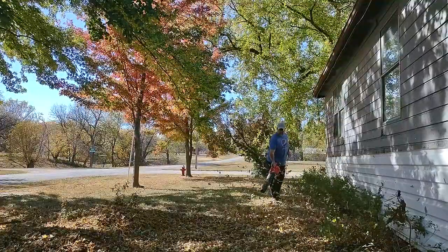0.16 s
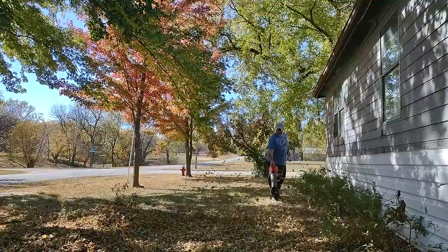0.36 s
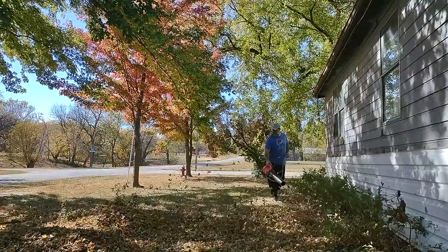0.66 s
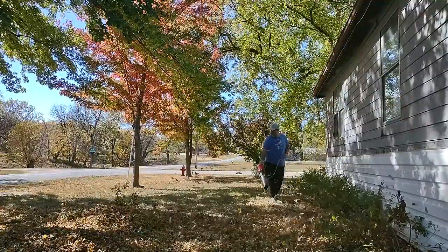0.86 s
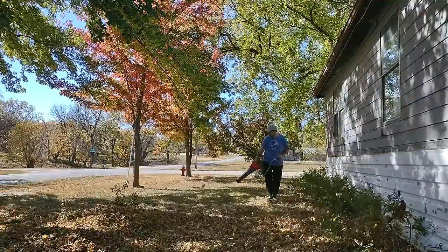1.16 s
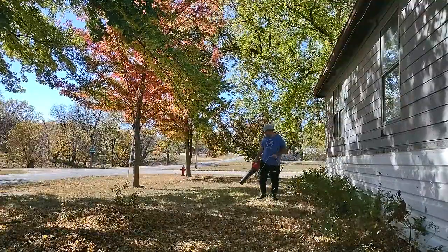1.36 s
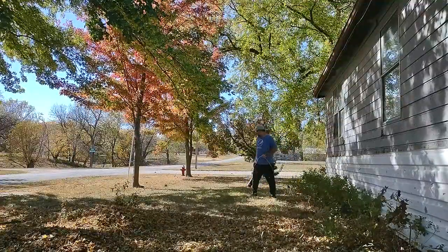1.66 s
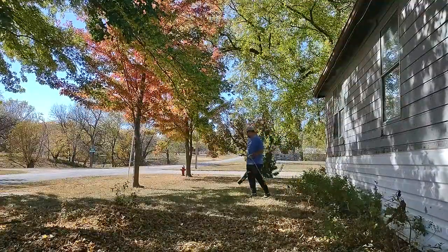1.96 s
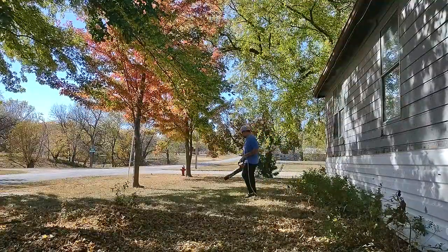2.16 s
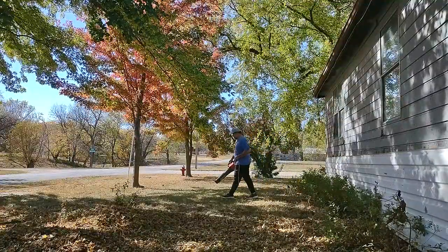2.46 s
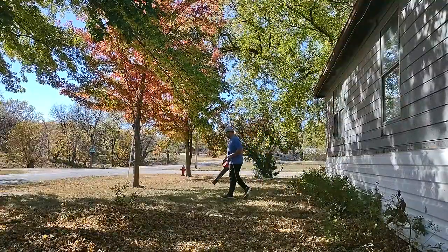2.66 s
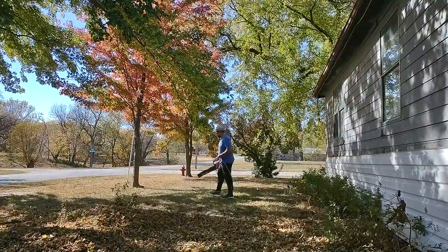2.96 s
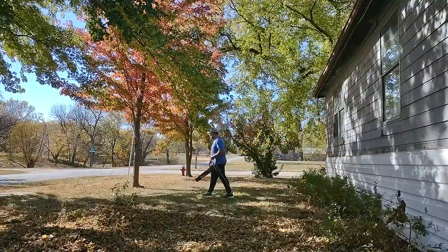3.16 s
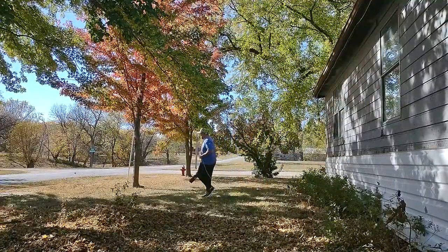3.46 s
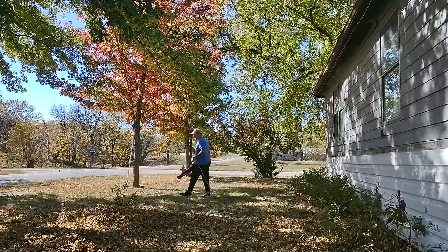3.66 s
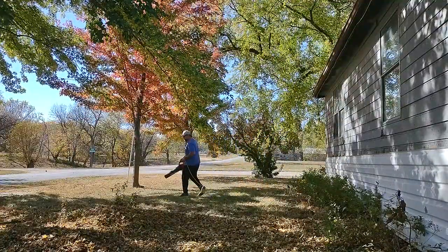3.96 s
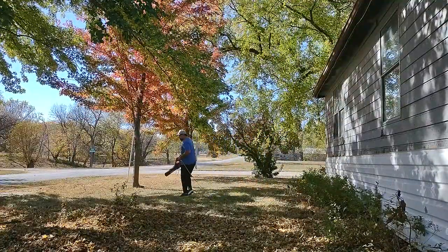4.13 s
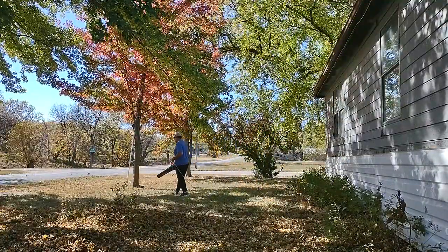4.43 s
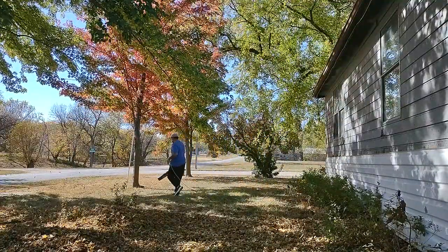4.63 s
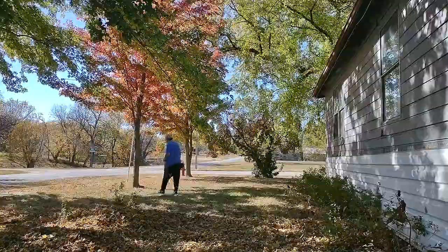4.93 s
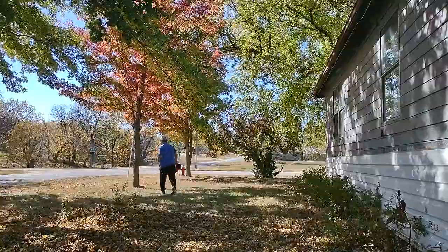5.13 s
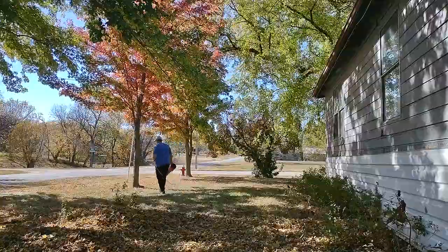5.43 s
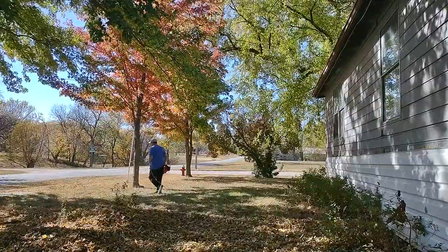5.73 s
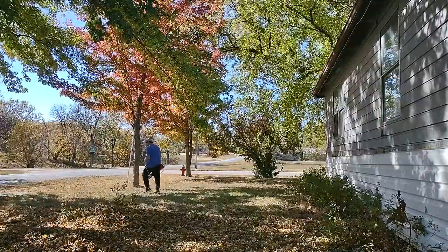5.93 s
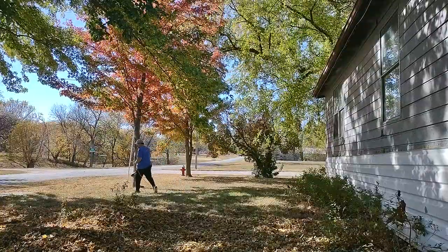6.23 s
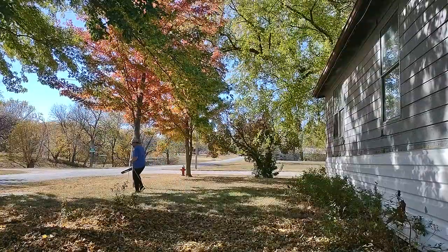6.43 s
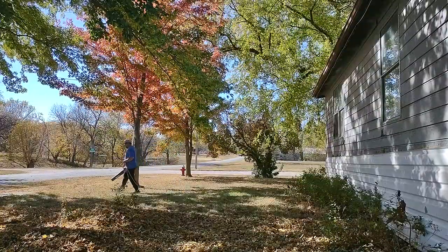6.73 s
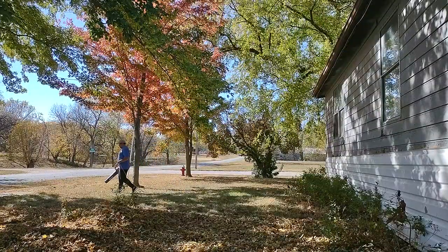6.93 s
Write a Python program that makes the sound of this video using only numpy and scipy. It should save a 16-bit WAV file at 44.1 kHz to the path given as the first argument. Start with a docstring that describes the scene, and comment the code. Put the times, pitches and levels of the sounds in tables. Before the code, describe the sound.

Outdoors beside a house wall, an electric leaf blower is already running: a broad, bright rush of air with a high, rapidly beating fan whine. It starts strong, drops as the nozzle swings away, returns in duller swells, and ends weaker. Faint breeze rumbles low on a fixed stereo microphone, with one soft low pop before the middle.

```python
"""On a lawn with a house wall to the right, an electric leaf blower is swung about and carried away.
Its rush is noise shaped by tube, housing and reflections, with a close echo from the wall.
Its eleven-blade fan whines as sines on one rotor angle, beating differently at the two microphones.
Puffs of breeze rumble low on the ports as shaped noise, with one pop, above a faint mains hum, a sine."""
import sys
import numpy as np
from scipy import signal
from scipy.fft import rfft, irfft
from scipy.io import wavfile
from scipy.ndimage import uniform_filter1d, map_coordinates

SR = 44100
rng = np.random.default_rng(int(sys.argv[2]) if len(sys.argv) > 2 else 0)


def waveform_to_disk(signal):
    """Save audio, clipped to [-1, 1], as 16-bit WAV at the path in sys.argv[1]."""
    frames = np.transpose(np.atleast_2d(signal))
    scaled = np.clip(frames, -1, 1) * 32767
    samples = np.round(scaled).astype(np.int16)
    wavfile.write(sys.argv[1], SR, samples)


N = 312669
TIME = np.arange(N) / SR
HZ = np.fft.rfftfreq(N + 3, 1 / SR) + 1  # one Hz up, so that logs and divisions stay finite

# Ways from the blower to the ports.
# Each row: time in seconds, lag of left behind right on the direct way in ms (below zero the left leads),
# wall echo delay at the right in ms.
PATHS = [(0, .04, 1.2), (1, .05, 1.2), (2.2, -.03, 1.3), (2.7, -.07, 2.2), (3.3, -.09, 2.45),
         (4.15, -.15, 3.03), (4.6, -.17, 3.12), (5.1, -.12, 2.76), (5.9, -.12, 2.88), (7.09, -.24, 3.45)]


def undb(db):
    """Decibels to gain."""
    return 10 ** (np.asarray(db) / 20)


def curves(table):
    """Each column of a table after the time, drawn sample by sample."""
    seconds, *columns = np.transpose(table)
    return np.array([np.interp(TIME, seconds, column) for column in columns])


def gains(table):
    """Level columns in dB joined as amplitudes, the way beats swell."""
    return curves([(seconds, *undb(db)) for seconds, *db in table])


def bumps_db(modes):
    """Resonances and notches as a dB curve over frequency."""
    return sum(db / (1 + (2 * (HZ - hz) / width) ** 2) for hz, width, db in modes)


def shaped(x, gain):
    """Filter by a gain over frequency."""
    return irfft(rfft(x, N + 3) * gain, N + 3)[..., :N]


def walk(rate):
    """Random levels held 1 / rate seconds and slewed twice."""
    hold = int(SR / rate)
    steps = np.repeat(rng.standard_normal(N // hold + 1), hold)
    return uniform_filter1d(uniform_filter1d(steps, hold), hold)[:N]


def delayed(x, ms):
    """A moving delay, read between samples; a negative delay reads ahead."""
    return map_coordinates(x, [np.arange(N) - ms * SR / 1000], order=3, mode="mirror")


def beams():
    """Gain in dB of five bands, low to high, as the turning nozzle beams each with its own strength."""
    # The nozzle's moves, in dB before each band takes its share.
    # Each row: time in seconds, level in dB, treble in dB, bass in dB.
    nozzle = [(0.0, 6.5, 1, 5.5), (1.07, 6, 1.5, -3), (1.31, 5, 2.5, 3.1), (1.61, 1.5, 1, -2.5),
              (1.97, -5.5, 0, 5), (2.09, -4.5, -1, 4.5), (2.32, -6, 0.8, 5.5), (2.8, -1.3, -2.5, -0.3),
              (3.1, -4.5, -4, 5.5), (3.52, 0, -2.5, -3.5), (3.82, -2.5, -3.2, -0.5), (4.36, 3.5, 1, -5.5),
              (4.54, 1.5, -0.5, -4), (4.9, -4, -2.5, 0.9), (5.5, 5, -6.5, 2.5), (6.4, -5, -3.5, 4.4),
              (6.58, -7, -5.5, 5.5), (7.09, -5, -2.5, -0.8)]
    # How far each band follows the level, the treble and the bass: one plain factor per band.
    level_share = (0.95, 1.05, 1.18, 0.78, 1.28)
    treble_share = (0.096, -0.15, -0.43, 1.51, 1.06)
    bass_share = (1, 0, 0, 0, 0)
    return np.transpose([level_share, treble_share, bass_share]) @ curves(nozzle)


def air(flicker):
    """Turbulent rush: noise coloured by tube and close reflections, its bands beamed and flickering."""
    # Colour of the rush. Each row: frequency in Hz, relative density in dB per Hz.
    rush_colour = [(200, -29), (330, -10.5), (480, -8), (620, -10), (1000, -5), (1450, -7), (2000, 0.5),
                   (2700, -1), (3500, -2), (4300, 7.5), (4900, -4), (7000, -7.5), (10000, -6),
                   (15500, -10.5)]
    # Nozzle tube and housing, resonances and a notch. Each row: frequency in Hz, width in Hz, height in dB.
    tube = [(840, 80, 4), (2120, 100, 3), (3400, 500, 3), (7500, 500, 3), (4300, 550, -7)]
    # Reflections that travel with the blower, in the tube and off the lawn.
    # Each row: delay in ms, share of the direct sound at low frequencies.
    close = [(.82, .25), (1.5, .3), (4.8, .15)]
    # Centres of the bands that beams() drives, in Hz.
    beam_hz = (750, 2400, 5700, 8500, 13000)
    rms_db = -26  # before beaming and flicker

    log_hz = np.log(HZ)
    colour_hz, colour_db = np.transpose(rush_colour)
    colour = undb(np.interp(log_hz, np.log(colour_hz), colour_db) + bumps_db(tube))
    reflections = sum(share * np.exp(-2j * np.pi * HZ * ms / 1000) for ms, share in close)
    # short waves are not thrown back cleanly
    colour = colour * (1 + reflections / (1 + (HZ / 3500) ** 4))
    noise = rng.standard_normal(N) * undb(rms_db) / np.sqrt(np.mean(abs(colour) ** 2))

    # neighbouring bands crossfade over log frequency
    bands = [np.interp(log_hz, np.log(beam_hz), row) for row in np.eye(len(beam_hz))]
    return sum(undb(db + flicker * walk(9)) * shaped(noise, colour * band)
               for db, band in zip(beams(), bands))


def rush():
    """Air heard directly, via the wall, and scattered by trees and ground, unlike at the two ports."""
    # Wall echo, as the carrier's body shades it or the direct sound.
    # Each row: time in seconds, echo against direct in dB, mirror-like share of the long waves from 0 to 1.
    wall_moves = [(0, 1, .55), (2.3, -2, .3), (3, 1, .85), (4.4, -2, .95), (5.5, -.5, 1)]
    # Resonances of the right port. Each row: frequency in Hz, width in Hz, height in dB.
    right_port = [(7650, 1440, 12.5), (10200, 4000, 4.5)]
    left_extra_ms, scatter_db = .33, -5  # the wall echo reaches the left port later

    lag, echo_ms = curves(PATHS)
    echo_db, mirror = curves(wall_moves)
    jet, blur, *scatter = (air(flicker=2.0) for _ in range(4))

    # the stepped boards mirror long waves and blur short ones into unrelated noise
    smooth = 1 / (1 + (HZ / 3600) ** 6)
    mirrored = mirror * shaped(jet, np.sqrt(smooth))
    blurred_long = np.sqrt(1 - mirror ** 2) * shaped(blur, np.sqrt(smooth))
    thrown = mirrored + blurred_long + shaped(blur, np.sqrt(1 - smooth))

    direct = np.array([delayed(jet, lag), jet])
    wall = np.array([delayed(thrown, echo_ms + left_extra_ms), delayed(thrown, echo_ms)])
    # long waves arrive alike, so the unlike scatter loses its lows
    scatter = shaped(np.array(scatter), 1 / np.sqrt(1 + (2200 / HZ) ** 2))

    balance = np.sqrt(1 + undb(2 * echo_db))  # shares the power between direct and wall
    ports = (direct + undb(echo_db) * wall) / balance + undb(scatter_db) * scatter
    ports[1] = shaped(ports[1], undb(bumps_db(right_port)))
    return ports


def flutter_tone(angle, rough, beat=0):
    """A sine, rms 1 before beat and flutter, whose size and phase flutter apart at the two ports."""
    in_step, across = np.array([[walk(22.014) + walk(70) for _ in "lr"] for _ in "ab"])
    phasor = 1 + beat + rough * (in_step + 1j * across)
    return np.sqrt(2) * np.imag(phasor * np.exp(1j * angle))


def whine_beat():
    """A second, turning phasor of the whine at each port; each whole cycle is one swell and dip."""
    # Each row: time in seconds, beat phase of the whine in cycles.
    beat_phase = [(0, -.32), (.34, 1.05), (.79, 3.93), (.85, 4.61), (1.05, 5.47), (1.19, 6.64), (1.77, 9.3),
                  (2.26, 11.6), (2.34, 12.5), (2.56, 14.52), (2.95, 15.28), (3.06, 16.16), (3.58, 17.35),
                  (4.46, 20.55), (4.55, 21.58), (5.23, 24.1), (6.29, 32.7), (6.68, 33.85), (6.91, 36),
                  (7.09, 36.3)]
    # Size of the second phasor against the steady whine as a gain, left and right.
    beat_depth = (0.64, 0.46)
    left_ahead_cycles = 0.013

    cycles = curves(beat_phase) + np.array([[left_ahead_cycles], [0]])
    return np.array(beat_depth)[:, None] * np.exp(2j * np.pi * cycles)


def fan():
    """Shaft and blade tones on one rotor angle; gusty inflow roughens the blade tones."""
    # Blade rate as heard, bent by the swing of the arm. Each row: time in seconds, rate in Hz.
    blade_rate = [(0.0, 3752.0), (0.17, 3742.0), (0.47, 3758.0), (1.25, 3727.0), (1.37, 3738.0),
                  (2.03, 3735.0), (2.5, 3754.0), (2.62, 3756.0), (2.98, 3731.0), (3.34, 3759.0),
                  (3.64, 3733.0), (4.18, 3759.0), (4.54, 3720.0), (4.72, 3724.0), (5.92, 3744.0),
                  (6.28, 3727.0), (6.87, 3770.0), (7.09, 3748.0)]
    # Blade tone before beat and flutter. Each row: time in seconds, left level in dB, right level in dB.
    whine_levels = [(0.0, -23.5, -30), (0.34, -14, -22), (1.18, -20, -25), (2.26, -19, -20.5),
                    (2.5, -26, -21), (2.86, -24.5, -16), (3.1, -26.5, -21.5), (3.7, -30, -19),
                    (4.18, -28.5, -24), (4.42, -29, -27.0), (4.66, -24.5, -46), (4.9, -31, -29),
                    (5.74, -29, -34.5), (6.58, -35.5, -45.5), (6.82, -26.5, -32.5), (7.08, -25.5, -30)]
    # Its second harmonic, likewise. Each row: time in seconds, left level in dB, right level in dB.
    octave_levels = [(0.0, -25, -18.5), (0.47, -25, -19), (1.37, -19.5, -17.5), (1.49, -29, -16),
                     (2.26, -34, -25), (2.38, -33, -39), (2.68, -29.5, -19), (3.28, -37, -51),
                     (3.4, -34, -22.5), (3.76, -27, -28), (3.88, -35.7, -27.8), (4.42, -35.5, -36),
                     (4.9, -38, -38), (5.68, -42, -36), (6.63, -38.5, -37.5), (7.09, -36, -30.5)]
    # Once-a-turn tone of the unbalanced rotor before flutter.
    # Each row: time in seconds, left level in dB, right level in dB.
    shaft_levels = [(0.0, -34, -40), (0.34, -35.5, -40), (1.02, -48, -44), (1.17, -48, -54),
                    (1.4, -52, -44), (2.26, -45, -45.5), (2.9, -44.5, -70), (3.23, -38, -44),
                    (3.55, -43.5, -49), (3.98, -37, -35.5), (4.7, -36, -34.5), (5.14, -55, -63),
                    (5.48, -44.5, -44), (5.75, -45, -46), (5.94, -42, -41), (6.34, -43, -42),
                    (6.56, -53, -55), (7.09, -42, -38.5)]
    blade_count = 11

    turn = 2 * np.pi * np.cumsum(curves(blade_rate)[0]) / SR / blade_count
    blades = blade_count * np.array([turn, turn])
    # the left port lags at first, then leads
    turn = np.array([delayed(turn, curves(PATHS)[0]), turn])
    low_db, mid_db, *_, top_db = beams()

    shaft = gains(shaft_levels) * flutter_tone(turn, rough=0.14)
    twice = undb(1.56 * low_db - 55.0) * flutter_tone(2 * turn, rough=0.69)
    eighth = undb(mid_db - 50) * flutter_tone(8 * turn, rough=1.0)

    beat = whine_beat()
    whine = undb(curves(whine_levels)) * flutter_tone(blades, rough=.4, beat=beat)
    # squared, the beat of the octave turns twice as fast
    octave = gains(octave_levels) * flutter_tone(2 * blade_count * turn, rough=0.66, beat=0.43 * beat ** 2)

    # third and fourth blade harmonics beam like the highest air, weaker at the left
    third = flutter_tone(3 * blade_count * turn, rough=.6)
    fourth = undb(-16) * flutter_tone(4 * blade_count * turn, rough=.9)
    upper_db = -40.5 + 1.05 * top_db + np.array([[-3], [2]])
    return shaft + twice + eighth + whine + octave + undb(upper_db) * (third + fourth)


def breeze():
    """Lumpy low rumble of air on the ports, unrelated left and right, and one lone pop at the left."""
    # Puffs of breeze. Each row: peak time in seconds, level in dB, left minus right in dB,
    # half length in seconds (to 1/e of the peak).
    puffs = [(.1, -39, 6, 0.51), (.65, -39.5, 4, 0.32), (1.026, -36, 9, 0.064), (1.607, -44, 3, 0.49),
             (2.167, -45, 5, 0.072), (2.45, -50, 8, 0.22), (3.66, -56, -12, 0.057), (4.15, -49, -3, 0.4),
             (4.75, -55, -2, 0.27), (5.213, -40, -9, 0.11), (5.75, -40, 0, 0.11),
             (6.006, -37.5, -16, 0.061), (6.14, -44, 5, .06), (6.296, -38, -12.5, 0.17),
             (6.694, -47, 2, 0.19), (6.984, -43.5, -9, 0.16)]
    calm_db = -60  # rumble between the puffs
    pop_s, pop_db, pop_hz, pop_ms = 2.623, -18, 125, 3  # moment, peak, pitch, bell-curve spread

    lumps = undb(5.5 * np.array([walk(20), walk(20)]))
    low_band = 1 / np.sqrt((1 + (62 / HZ) ** 10) * (1 + (HZ / 115) ** 4))
    rumble = shaped(lumps * rng.standard_normal((2, N)), low_band)
    swell = undb(calm_db)
    for peak_s, db, pan_db, half_s in puffs:
        sides_db = db + np.array([[pan_db], [-pan_db]]) / 2
        swell = swell + undb(sides_db) * np.exp(-((TIME - peak_s) / half_s) ** 2)
    rumble = rumble / np.std(rumble) * swell

    since_pop = TIME - pop_s
    pop_bell = np.exp(-.5 * (since_pop * 1000 / pop_ms) ** 2)
    rumble[0] += undb(pop_db) * np.cos(2 * np.pi * pop_hz * since_pop) * pop_bell
    return rumble


def mains_hum():
    """A faint sine at 120 Hz, alike at both ports, its level wavering at random around -54 dB."""
    return np.sqrt(2) * undb(-54 + 3.5 * walk(36)) * np.sin(2 * np.pi * 120 * TIME)


def scene():
    """Blower, breeze and hum."""
    return rush() + fan() + breeze() + mains_hum()


def record(dry):
    """The recorder clips the peaks and cuts the top steeply above 15.9 kHz."""
    # order 10, 0.2 dB ripple below the edge, 80 dB down above
    top_cut = signal.ellip(10, .2, 80, 15900, fs=SR, output="sos")
    return signal.sosfilt(top_cut, np.clip(dry, -.85, .85))


dry = scene()
out = record(dry)
waveform_to_disk(out)
```